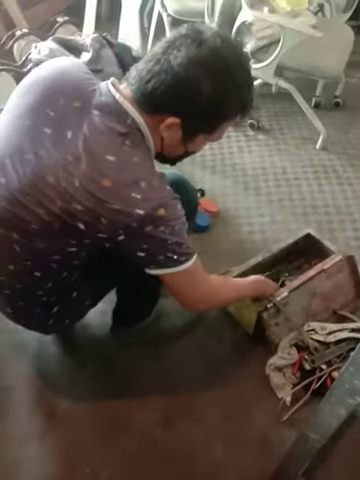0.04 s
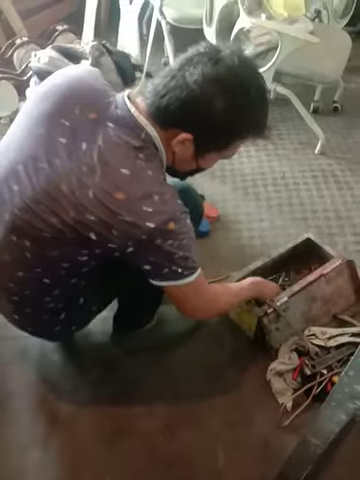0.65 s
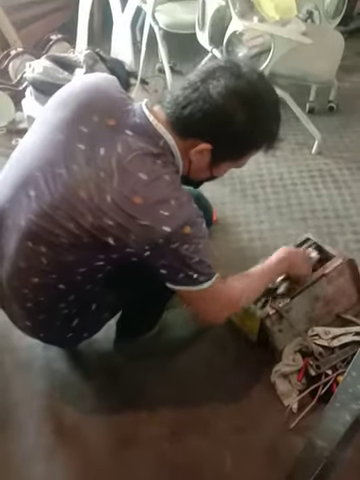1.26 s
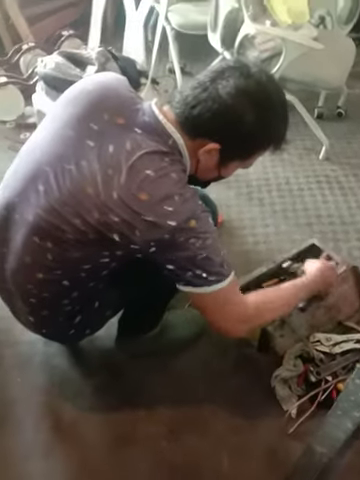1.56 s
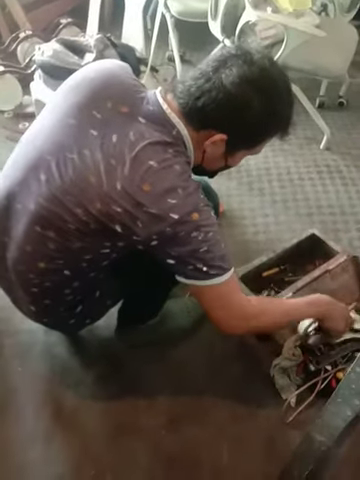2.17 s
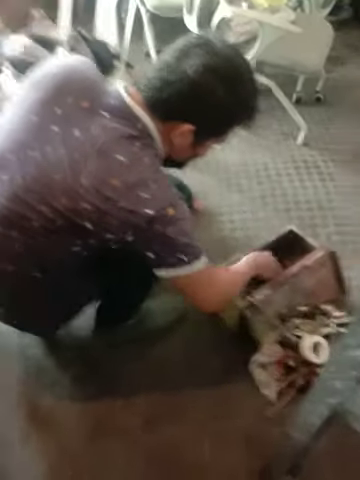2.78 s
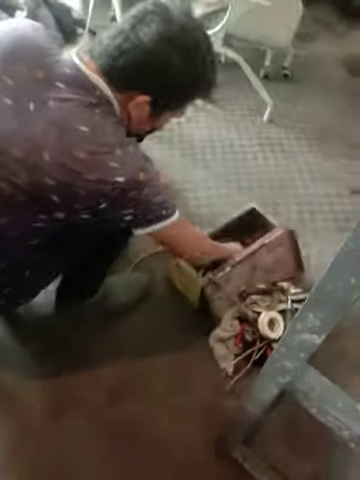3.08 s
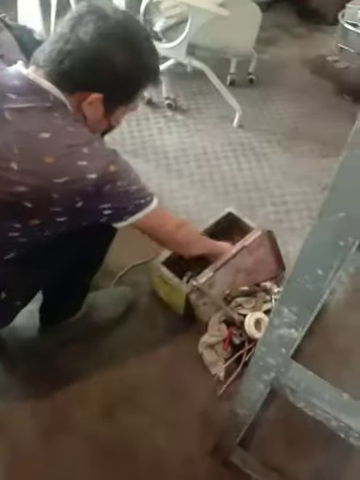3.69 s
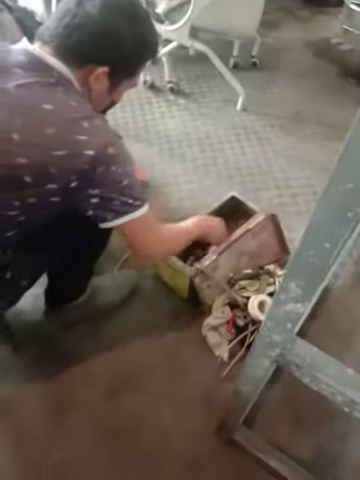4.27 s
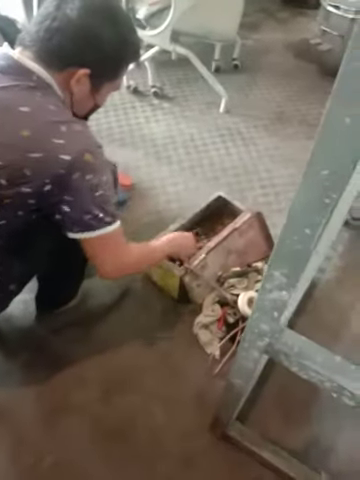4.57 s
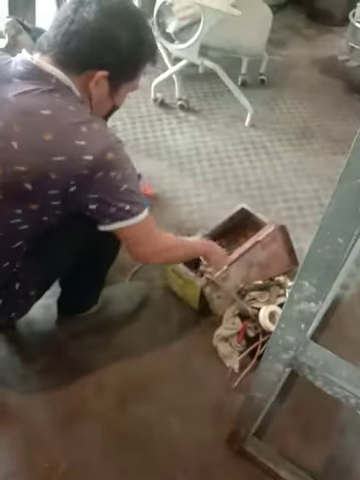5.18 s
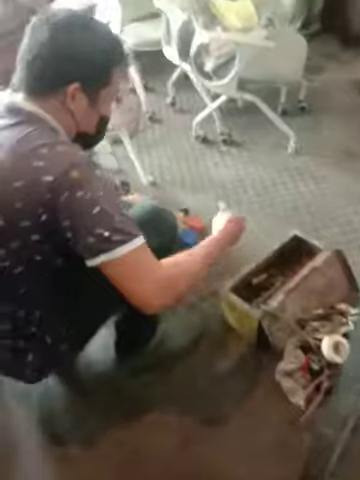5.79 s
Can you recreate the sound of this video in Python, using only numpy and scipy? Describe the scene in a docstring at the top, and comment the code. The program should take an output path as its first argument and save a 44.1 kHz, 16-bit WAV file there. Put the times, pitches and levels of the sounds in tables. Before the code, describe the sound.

Close, uneven bursts of metal tools clattering, snapping and scraping in a wooden box, bright where steel meets steel and dull against the boards. The box groans briefly as it is tugged, a few tools ring, and the searching carries on in spurts before stopping. Behind it are workshop reverberation, low rumble, a few soft thumps, a thin intermittent whistle and a faint far motor starting up.

```python
"""A hand rummages through steel tools in a wooden toolbox on the floor of a hard-walled workshop.
Tools clatter, scuff, snap and scrape: bright where bare steel meets steel, dull where it is bedded on
the boards. Handles knock, the tugged box groans, and a spanner, wrench, bit and washer ring out.
Behind it: room rumble, a few soft thumps, a thin high whistle and a far motor that starts to whine."""
import sys
import numpy as np
from scipy import signal
from scipy.fft import rfft, irfft, next_fast_len
from scipy.io import wavfile

SR = 44100
rng = np.random.default_rng(int(sys.argv[2]) if len(sys.argv) > 2 else 0)


def put_to_file(sound):
    """Save the sound as 16-bit audio at rate SR, in the file named by the first command-line argument."""
    columns = np.atleast_2d(sound).T  # one column per channel
    safe = np.clip(columns, -1, 1)
    whole_steps = np.round(safe * 32767)
    wavfile.write(sys.argv[1], SR, whole_steps.astype(np.int16))


N = 266452
TIME = np.arange(N) / SR

# room tone spectrum: f/Hz, relative level/dB
ROOM_TONE = [(25, -26), (60, -9), (105, 4), (190, -8), (400, -13.5), (750, -15.5), (1000, -10.5),
             (1250, -6.5), (1700, -18.5), (2500, -28.5), (3600, -19.5), (4700, -33), (7200, -40),
             (9000, -49), (15000, -55)]
# the far motor's rising whine: t/s, f/Hz, relative level/dB
MOTOR_GLIDE = [(5.529, 3660, -88), (5.6, 3650, -60.5), (5.75, 3674, -56), (5.85, 3720, -49.5),
               (6.04, 3786, -49.5)]
# whistle bursts: start t/s, end t/s, top line level/dB, lower lines level/dB
WHISTLE_CUES = [(0, 0.128, -56, -63), (0.664, 0.78, -56, -62.5), (1.305, 1.536, -43, -65),
                (1.522, 1.797, -52.5, -62), (5.333, 5.385, -61, -65)]
# the whistle's lower lines: f/Hz, relative level/dB
WHISTLE_LOWER = [(5170, -2.5), (6010, 7.5), (7170, 5), (7504, -4.5), (9300, -4.5), (10939, -2.5),
                 (12090, -1.5)]
# soft dull thumps, and handles knocking on the boards: t/s, peak level/dB, f/Hz
SOFT_THUMPS = [(1.600, -19.5, 96.3), (2.560, -26, 97), (3.175, -36.5, 103), (3.812, -33, 99),
               (4.888, -29.5, 90)]
HANDLE_KNOCKS = [(0.237, -21, 469), (0.286, -22, 396), (0.338, -23, 407), (1.159, -11.5, 390),
                 (1.956, -30.5, 420), (2.104, -22, 539), (3.544, -15, 402), (3.796, -13, 470),
                 (3.880, -22, 494), (4.620, -25, 436), (4.990, -28, 430)]
# reverb time of the workshop: f/Hz, t60/s
REVERB_DECAY = [(200, 0.24), (500, 0.84), (1300, 0.68), (4000, 0.73), (7000, 0.71), (11000, 0.5),
                (15000, 0.2)]
# reverb colour: f/Hz, level/dB against the send
REVERB_EQ = [(200, 0.5), (450, -2.5), (1200, -2), (4000, -2.5), (7000, -13), (14000, -0.5)]
# modes of a free spanner, a low-singing wrench, a jingling bit, a tinkling washer: f/Hz, level/dB, t60/s
SPANNER_MODES = [(4174, -13, .9), (4205, -13, .9), (4344, -15, .8), (5706, -17, .8), (6412, -3, .65),
                 (6440, -11, .4), (8414, -29, .9), (9927, -28, .8), (10400, -27, .5), (12950, -33, .5),
                 (14530, -16, .35), (14670, -21, .5)]
WRENCH_MODES = [(1094, -7.5, 0.87), (1224, -4.5, 0.77), (1280, -2.5, 0.55), (1347, -9, 0.46)]
BIT_MODES = [(7000, -6, .3), (9700, -3, .12), (9900, -3, .2), (10450, 0, .2), (10750, -3, .2)]
WASHER_MODES = [(10300, -10, .6), (11278, 0, .6), (11590, -2, .6)]
# the strikes that set them ringing: t/s, level/dB
SPANNER_STRIKES = [(0.199, -45.5), (2.143, -21), (2.238, -22), (2.31, -31.5)]
WRENCH_STRIKES = [(2.47, -25), (2.51, -52), (3.019, -37.5)]
BIT_STRIKES = [(0.283, -38.5), (0.528, -61.5), (0.766, -49.5), (3.811, -43), (4.321, -42.5), (4.367, -33.5),
               (4.410, -39)]
WASHER_STRIKES = [(5.016, -47.5)]
# tugs that shift the loaded box, at their hardest pull: t/s, level/dB
BOX_TUGS = [(0.998, -26.5), (1.284, -30.5)]
# the groan of the shifting box: f/Hz, relative level/dB
GROAN_EQ = [(110, -9), (160, -5), (240, -1), (340, 12.5), (500, -13.5), (680, 9.5), (900, 3), (1300, -18.5)]
# the five voices of the box and its load: f/Hz, relative level/dB
CLANK_EQ = [(450, -15.5), (720, -10.5), (1000, 2.5), (1250, 6), (1500, 3.5), (1860, 1), (2200, -3.5),
            (3200, -13.5)]
BOOM_EQ = [(120, -16.5), (200, -22.5), (280, -12), (385, 4), (470, 0.5), (560, -4), (660, -4), (800, -8.5),
           (1300, -30.5)]
CLACK_EQ = [(1500, 0), (2100, -0.5), (2850, 2), (3250, -0.5), (3700, 2), (4200, -4.5), (4600, -14.5),
            (6000, -32.5)]
CLINK_EQ = [(3900, -1.5), (4700, -11), (5400, 3.5), (6200, 3), (6800, -4), (8000, -13), (10500, -32)]
TICK_EQ = [(6500, -25), (8400, -12), (9200, -4), (10400, 1.5), (11500, -2), (13500, -8), (14700, -1),
           (15600, 0.5)]
VOICES = (CLANK_EQ, BOOM_EQ, CLACK_EQ, CLINK_EQ, TICK_EQ)
# tilt of each voice, in that order: gain/dB per dB of brightness
BRIGHTNESS_TILT = [-0.38, -0.41, 0.19, 0.5, 0.77]
# hand pushes that slide the tools: t/s, length/s, level/dB, brightness/dB, extra clack/dB, extra boom/dB
HAND_PUSHES = [(0, 0.024, -27, 9.5, -2.5, 0), (0.238, 0.11, -31, -3, 0, 8.5),
               (0.73, 0.25, -32.5, -4, 2, 5.5), (0.88, 0.41, -22.5, 1.5, 4, 1.5),
               (1.248, 0.088, -17, 5.5, -0.5, 2), (1.958, 0.13, -26, 0.5, 0.5, -8),
               (2.13, 0.17, -16.5, 21, -4, -7.5), (2.407, 0.2, -22.5, 7.5, 3, -4.5),
               (3.03, 0.21, -34, 13, -11, 0), (3.725, 0.16, -25, 2, 5, 5),
               (4.27, 0.14, -23.5, 5.5, -10, 5.5), (4.437, 0.66, -31.5, 1.5, 2, -1),
               (4.902, 0.13, -25, -1.5, -6, -4.5)]
# hard steel snapping against steel: t/s, peak level/dB, centre f/Hz
STEEL_SNAPS = [(1.221, -9, 5660), (2.2712, -22, 5560), (2.3988, -9.5, 6980), (3.1535, -19.5, 3930),
               (3.7475, -16, 5800), (4.341, -16.5, 6100)]
# glancing and square hits: t/s, level/dB, brightness/dB, extra clack/dB where flat faces meet
GLANCING_HITS = [(0.944, -17, -9, -13), (0.966, -14, -10.5, -6), (1.001, -15, -12.5, 1),
                 (1.19, -19, -11, -2), (1.304, -23, -9, 8), (1.954, -33, -5, 1), (2.236, -19, 14, 5),
                 (2.448, -17, 20.5, 0.5), (2.466, -12.5, 5, -9), (2.509, -20, 11, 5), (2.545, -21, 2, -3),
                 (2.992, -22.5, -1, 7), (3.297, -36.5, -7, 8.5), (3.774, -17.5, -2, -3),
                 (3.879, -32.5, -8, -1), (4.292, -24.5, 4.5, 2), (4.356, -19, 3.5, 6.5),
                 (4.612, -25.5, 0.5, 4), (4.977, -16, -2.5, 4), (5.047, -30, 9, 7), (5.34, -38.5, 3.5, -14)]
SQUARE_HITS = [(0.031, -32, 15, -12), (0.199, -43, 4, -1), (0.254, -30, 7, -5), (0.285, -23.5, 8.5, -3),
               (0.602, -40, -3.5, 2.5), (0.723, -27.5, 7.5, -1.5), (0.765, -39, 23, -14),
               (0.857, -16.5, -6.5, -9), (0.889, -17.5, -8.5, -6), (1.037, -23.5, -17, -12),
               (1.064, -22.5, -6, 3), (1.159, -16.5, -0.5, -3), (1.22, -17.5, 10, -14),
               (1.249, -13, -4, 3.5), (1.276, -19.5, -11.5, -7), (2.032, -39, 15, -6),
               (2.106, -20.5, -1, -8), (2.128, -17.5, -4, -6), (2.142, -22, 19, -10), (2.271, -22, 12, 7.5),
               (2.31, -24.5, 5.5, 10.5), (2.399, -24, 36.5, -4), (2.84, -40, 6, 7.5),
               (3.018, -18, 2.5, 5.5), (3.062, -43, 9, 4), (3.149, -26, 14.5, 8.5), (3.48, -39, 7.5, 7),
               (3.545, -27, -9.5, 3.5), (3.746, -21, 7.5, 10.5), (3.791, -16.5, 6.5, -11),
               (4.237, -24.5, -1.5, 10.5), (4.273, -35, -4, 16), (4.342, -24, 19, 4),
               (4.409, -28.5, 16, -14), (4.575, -38, 12, 1), (4.706, -33, 16, -9), (4.716, -30, -13.5, 3),
               (4.774, -23, -6.5, -7), (4.809, -26, -2.5, 0), (4.917, -24, -8, 8.5)]


def amp(db):
    """Decibels to gain."""
    return 10 ** (np.asarray(db) / 20)


def unit_rms(x):
    """Scales to rms 1."""
    return x / np.sqrt(np.mean(x ** 2) + 1e-20)


def curve_at(points, hz):
    """Reads a (f/Hz, value) table on a log-frequency axis."""
    f, value = np.transpose(points)
    return np.interp(np.log(hz + 1), np.log(f + 1), value)


def place(mix, start_s, sound):
    """Drops a sound into the mix at its cue."""
    part = mix[max(round(start_s * SR), 0):][:len(sound)]
    part += sound[:len(part)]


def wander(hz):
    """Smooth random modulation of rms 1 that rolls off above hz."""
    size = next_fast_len(N, True)
    lowpass = np.exp(-(np.fft.rfftfreq(size, 1 / SR) / hz) ** 2)
    return unit_rms(irfft(rfft(rng.standard_normal(size)) * lowpass, size)[:N])


def crackle(per_s, size=N):
    """Tiny contacts: impulses of random size at random times."""
    return rng.standard_normal(size) * (rng.random(size) < per_s / SR)


def body_response(eq, size=16384):
    """Minimum-phase response of an EQ curve, falling 24 dB an octave beyond its ends."""
    hz = np.fft.rfftfreq(size, 1 / SR) + 1
    octaves_out = np.maximum(np.log2(eq[0][0] / hz), 0) + np.maximum(np.log2(hz / eq[-1][0]), 0)
    log_gain = np.log(amp(np.maximum(curve_at(eq, hz) - 24 * octaves_out, -90)))
    mirrored = np.r_[log_gain, log_gain[-2:0:-1]]
    return np.exp(np.conj(signal.hilbert(mirrored)))[:len(hz)]


def rubbed(slips, eq):
    """Friction slips heard through a resonant body, at rms 1."""
    return unit_rms(signal.oaconvolve(slips, irfft(body_response(eq)))[:N])


def room_tone(level_db=-51.5, swell_db=1):
    """A bed of workshop rumble and hiss that swells a little."""
    spectrum = amp(curve_at(ROOM_TONE, np.fft.rfftfreq(N, 1 / SR)))
    noise = irfft(rfft(rng.standard_normal(N)) * spectrum, N)
    return amp(level_db + swell_db * wander(12)) * unit_rms(noise)


def far_motor(trim_db=-1, blur_hz=45, octave_db=-32):
    """A far whine and its octave, blurred by the room."""
    times, hz, db = np.transpose(MOTOR_GLIDE)
    rotor = np.exp(2j * np.pi * np.cumsum(np.interp(TIME, times, hz)) / SR)
    whine = rotor + amp(octave_db) * rotor ** 2
    blur = 1 + wander(blur_hz) + 1j * wander(blur_hz)
    return amp(trim_db + np.interp(TIME, times, db, left=-99)) * (whine * blur).real


def thin_whistle(top_hz=15020, top_width_hz=120, lower_width_hz=70, flutter_db=3):
    """Fuzzy, fluttering high lines that switch on and off together."""
    top = wander(top_width_hz) * np.sin(2 * np.pi * top_hz * TIME)
    lower = sum(amp(db) * wander(lower_width_hz) * np.sin(2 * np.pi * hz * TIME)
                for hz, db in WHISTLE_LOWER)
    out = np.zeros(N)
    for start, end, top_db, lower_db in WHISTLE_CUES:
        gate = np.clip((TIME - start) / 0.004, 0, 1) * np.clip((end - TIME) / 0.05 + 1, 0, 1)
        out += gate * (amp(top_db) * top + amp(lower_db) * lower)
    return out * amp(flutter_db * wander(1.6))


def thuds(cues, attack_s):
    """Each thud is one heavily damped mode: a few cycles that swell and die."""
    t, out = np.arange(SR // 8) / SR, np.zeros(N)
    envelope = (t / attack_s * np.exp(1 - t / attack_s)) ** 2
    for start, db, hz in cues:
        place(out, start, amp(db) * envelope * np.sin(2 * np.pi * hz * t))
    return out


def workshop_reverb(send, build_s=0.0014):
    """Dense reflections off hard walls; each band dies at its own speed."""
    build_up = 1 - np.exp(-np.arange(SR) / SR / build_s)
    reflections = rng.choice([-1., 1.], SR) * (rng.random(SR) < 1 / 8) * build_up
    hz, t, bands = signal.stft(reflections, SR, nperseg=256)
    t60 = curve_at(REVERB_DECAY, hz)[:, None]
    colour = amp(curve_at(REVERB_EQ, hz))[:, None]
    unit_energy = np.sqrt(16 * np.log(1000) / (SR * t60))
    tail = signal.istft(bands * np.exp(-np.log(1000) * t / t60) * colour * unit_energy, SR, nperseg=256)
    return signal.fftconvolve(send, tail[1])[:N]


def box_groan(slips_per_s=400, swell_s=0.05):
    """The box sticks and slips on the floor as each tug swells and fades."""
    pull = sum(amp(db) / (1 + ((TIME - peak_s) / swell_s) ** 2) ** 2 for peak_s, db in BOX_TUGS)
    return pull * rubbed(crackle(slips_per_s), GROAN_EQ)


def ringing_tool(modes, strikes, uneven_db=2, waver=0.77, waver_hz=45, attack_s=0.00103):
    """Modes of one tool, wavering as it rocks; each strike lands elsewhere and weights them anew."""
    hz, db, t60 = np.transpose(modes)[:, :, None]
    t, out = np.arange(SR) / SR, np.zeros(N)
    envelopes = (1 - np.exp(-t / attack_s)) * np.exp(-np.log(1000) * t / t60)
    partials = amp(db) * envelopes * np.sin(2 * np.pi * hz * t)
    for start, strike_db in strikes:
        weights = amp(strike_db + uneven_db * rng.standard_normal(len(modes)))
        place(out, start, weights @ partials)
    return out * (1 + waver * wander(waver_hz))


def voice_levels(level_db, bright_db, clack_db, boom_db=0):
    """The five voices' levels in dB for one contact: brightness tips the balance from boards to steel."""
    return level_db + bright_db * np.array(BRIGHTNESS_TILT) + np.array([0, boom_db, clack_db, 0, 0])


def tool_scrape(faders_db, slips_per_s=3000, spread_db=1.5, grip_s=0.0067, release_s=0.043):
    """Steel slips unevenly on steel: each push grips, holds, and fades as the pile comes to rest."""
    slip_sizes = amp(spread_db * np.minimum(rng.exponential(1, N), 3))
    slips = slip_sizes * crackle(slips_per_s)
    power = np.zeros((len(VOICES), N))
    for start, length, *contact in HAND_PUSHES:
        grip = np.clip((TIME - start) / grip_s, 0, 1)
        release = np.exp(-np.maximum(TIME - start - length, 0) / release_s)
        power += np.outer(amp(voice_levels(*contact) + faders_db) ** 2, (grip * release) ** 2)
    return sum(gain * rubbed(slips, eq) for gain, eq in zip(np.sqrt(power), VOICES))


def steel_snaps(attack_s=0.0008, scatter_hz=900, mode_count=14):
    """Hard steel on steel: an instant of bright ringing, spread over many close modes."""
    t, out = np.arange(SR // 50) / SR, np.zeros(N)
    for start, db, centre_hz in STEEL_SNAPS:
        offset, phase = rng.random((2, mode_count, 1))
        mode_hz = centre_hz + scatter_hz * (2 * offset - 1)
        snap = t * np.exp(-t / attack_s) * np.sin(2 * np.pi * (mode_hz * t + phase)).sum(0)
        place(out, start, amp(db) * snap / abs(snap).max())
    return out


def damped_steel(size, ring_db=5, width_hz=30, mode_count=36):
    """Response of one steel tool damped by the pile: a direct click plus scattered modes."""
    hz = np.fft.rfftfreq(size, 1 / SR)
    mode_hz = 2000 + 13500 * rng.random((mode_count, 1))
    modes = rng.standard_normal((mode_count, 1)) / (1 + 2j * (hz - mode_hz) / width_hz)
    return 1 + amp(ring_db) * modes.sum(0)


def tool_clatter(hits, faders_db, attack_s, decay_s, settle_db=-15, settle_s=0.05, size=16384):
    """Each hit is a chatter of contacts and a fainter settling of the pile, coloured by tool and box."""
    t, out = np.arange(size) / SR, np.zeros(N)
    attack = (1 - np.exp(-t / attack_s)) ** 2
    envelope = attack * (np.exp(-t / decay_s) + amp(settle_db) * np.exp(-t / settle_s))
    voices = np.array([body_response(eq, size) for eq in VOICES])
    tools = [damped_steel(size) for _ in range(10)]
    for start, *contact in hits:
        chatter = crackle(per_s=8000, size=size) * envelope
        tool = tools[rng.integers(len(tools))]
        layers = irfft(rfft(chatter) * tool * voices, size)
        layers *= np.sqrt(SR / 50) / np.linalg.norm(layers, axis=1, keepdims=True)  # as 20 ms at rms 1
        place(out, start, amp(voice_levels(*contact) + faders_db) @ layers)
    return out


def scene():
    """Mono mix: tools and box up front, the workshop's reverb around them, the background behind."""
    # faders run clank, boom, clack, clink, tick
    blows = tool_clatter(SQUARE_HITS, [-10, -14, -17, -16.5, -30], attack_s=0.00012, decay_s=0.0069)
    scuffs = tool_clatter(GLANCING_HITS, [-11, -16, -16, -15, -28.5], attack_s=0.0017, decay_s=0.018)
    snaps = steel_snaps()
    scrapes = tool_scrape(faders_db=[-12.5, -17.5, -19, -21.5, -45.5])
    rummage = blows + scuffs + snaps + scrapes + box_groan()
    rings = (ringing_tool(SPANNER_MODES, SPANNER_STRIKES) + ringing_tool(WRENCH_MODES, WRENCH_STRIKES)
             + ringing_tool(BIT_MODES, BIT_STRIKES) + ringing_tool(WASHER_MODES, WASHER_STRIKES))
    knocks = thuds(HANDLE_KNOCKS, attack_s=0.0051)
    whistle = thin_whistle()
    reverb = workshop_reverb(rummage + amp(-1.5) * knocks + amp(-10.5) * rings + amp(-3) * whistle)
    background = room_tone() + thuds(SOFT_THUMPS, attack_s=0.0073) + amp(-1.5) * whistle + far_motor()
    return (rummage + rings + knocks + reverb + background)[None]


def record(dry, port_hz=1258, port_q=20, port_db=2, cutoff_hz=15750):
    """The microphone port rings at one pitch, and a steep low-pass trims the very top."""
    port_ring = signal.lfilter(*signal.iirpeak(port_hz, port_q, SR), dry)
    lowpass = signal.firwin(301, cutoff_hz, window=("kaiser", 8), fs=SR)
    return signal.oaconvolve(dry + amp(port_db) * port_ring, lowpass[None], "same")


dry = scene()
out = record(dry)
put_to_file(out)
```